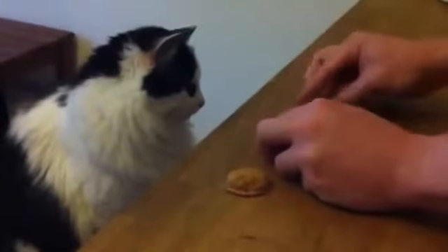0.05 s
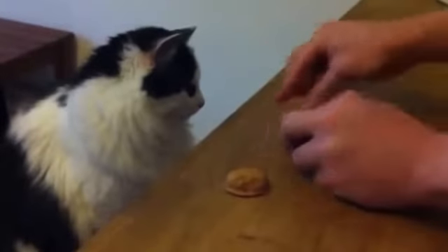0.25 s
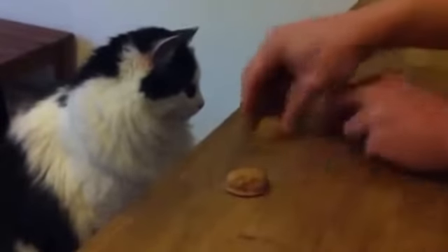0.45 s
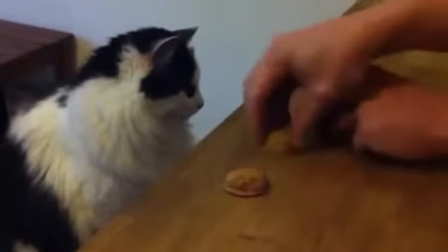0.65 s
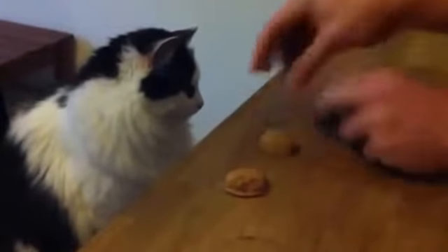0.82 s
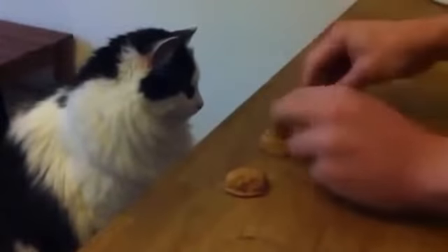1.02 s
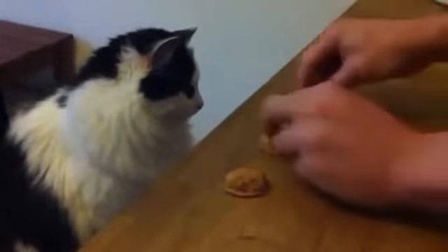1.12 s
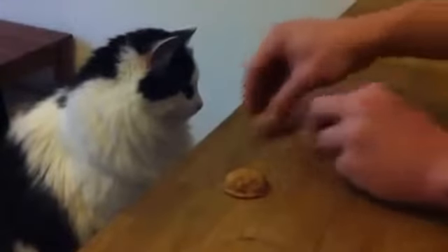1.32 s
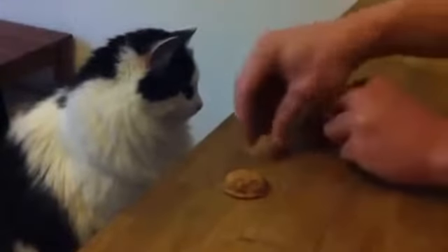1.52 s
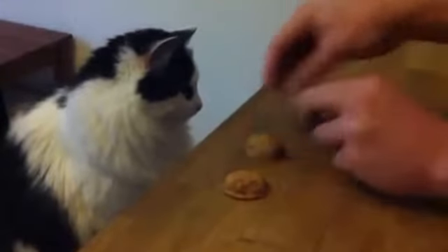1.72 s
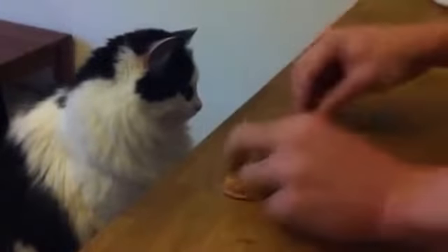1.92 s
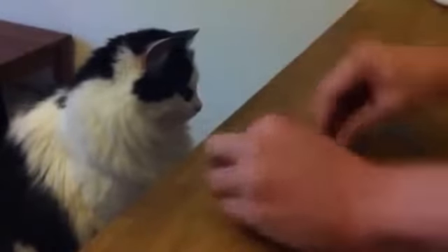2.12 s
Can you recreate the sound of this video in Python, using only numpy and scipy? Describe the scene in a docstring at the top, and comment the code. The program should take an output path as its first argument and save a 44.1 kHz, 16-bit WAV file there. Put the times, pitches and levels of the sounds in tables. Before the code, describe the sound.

Nut shells clack down and scrape across a wooden table in two short pushes.

```python
"""A small room, a shell game on a wooden table. Nut shells clack down, then are pushed across it twice.
Their rims catch on the grain, which rings the shells and rumbles in the board; they rattle to rest.
The hand's weight thumps the table softly. A fingertip drags faintly at the end of the first push."""
import sys
import numpy as np
from scipy import signal
from scipy.fft import rfft, irfft
from scipy.io import wavfile

SR = 44100
rng = np.random.default_rng(int(sys.argv[2]) if len(sys.argv) > 2 else 0)


def to_wav(sig):
    """Store sig (one row per channel, or 1-D mono) as 16-bit WAV at the path in sys.argv[1].

    Samples outside -1..1 are clipped; the rate is SR.
    """
    pcm = np.clip(np.atleast_2d(sig), -1, 1) * 32767
    pcm = np.round(pcm).astype(np.int16)
    wavfile.write(sys.argv[1], SR, pcm.T)  # frames by channels


N = 94815

# Room background. Each row: frequency in Hz, relative density in dB.
BACKGROUND_SPECTRUM = [(25, -13), (60, -19), (105, -3.5), (150, -3), (215, 8), (300, -1), (500, -5),
                       (1200, -7), (2500, -11.5), (5000, -12), (10000, -14), (15500, -15.5)]
# Rubbed resonances. Each row: centre in seconds, half length in seconds, pitch in Hz, width in Hz,
# gain in dB.
SWELLS = [(0.028, 0.029, 1460, 730, -68.5), (.522, .04, 1470, 377, -31.5), (0.553, 0.026, 2064, 490, -28),
          (0.871, 0.064, 1050, 404, -48.5), (1.391, 0.033, 2320, 200, -43.5), (1.41, 0.076, 6970, 795, -51),
          (1.425, 0.05, 3400, 700, -46), (1.418, .04, 840, 162, -49.5), (1.459, 0.026, 2000, 750, -36.5),
          (1.529, 0.019, 2210, 460, -37.5), (1.752, 0.13, 103, 24.4, -70), (1.777, 0.034, 1000, 470, -44)]
# Shells hitting the table. Each row: start in seconds, table gain in dB, shell gain in dB,
# contact corner in Hz, tick gain in dB, tick pitch in Hz, relative crunch gain in dB.
CONTACTS = [(.114, -51, -69, 1084, -51, 1220, -92), (0.2194, -21, -28, 3030, -19, 3300, -23),
            (0.2226, -50, -49, 3000, -21, 3830, -28), (.2322, -31, -33, 2500, -24.5, 3000, -38),
            (.2610, -23, -23, 1800, -27, 2720, -40), (0.2665, -23.5, -35, 4050, -25, 3120, -17),
            (.2686, -20.5, -20, 9500, -23, 6470, -32), (.2692, -36, -27, 3700, -14.5, 2300, -19.5),
            (.878, -32, -31, 3000, -32.5, 3190, -46), (0.9481, -41, -37, 2100, -27, 2200, -58),
            (.9615, -34.5, -65, 2198, -26.5, 2110, -63), (.989, -49, -36, 2000, -40, 2070, -60),
            (1.282, -50, -43, 1780, -60, 2200, -65), (1.290, -35.5, -35, 1790, -39, 2200, -60),
            (1.294, -36, -36, 1780, -36, 2300, -60), (1.677, -44, -21, 2300, -34, 2050, -38),
            (1.683, -48, -45, 2300, -18, 1990, -42), (1.7163, -42, -25, 3860, -31, 2240, -35),
            (1.743, -28.5, -44, 7000, -44, 2350, -34), (1.755, -32.5, -53, 8000, -35, 4300, -39),
            (1.781, -41.5, -32, 6460, -32.5, 4080, -34), (1.7845, -43, -53, 2960, -30, 2000, -28),
            (1.817, -32, -33, 2620, -33.5, 3330, -34), (2.1363, -42, -33, 1890, -35, 2590, -61),
            (2.1388, -32.5, -30, 1900, -48, 2220, -29.5), (2.1425, -40, -45, 2050, -32.5, 2120, -28)]
# Table and shell modes. Each row: frequency in Hz, relative gain in dB, T60 in seconds.
TABLETOP_MODES = [(250.5, -31.5, 0.17), (824, -12, 0.053), (1078, -18.5, 0.06), (1254, -10, 0.02),
                  (1550, -6.5, 0.0073)]
NUTSHELL_MODES = [(2106, -4, 0.027), (2373, -11.5, 0.05), (2980, -12.5, 0.031), (3560, -15, 0.014),
                  (4760, -12, 0.0092), (5200, -4.5, 0.01), (6140, -8.5, 0.0044), (6680, -5.5, 0.012),
                  (9600, -37, .005), (11800, -23, 0.001), (13000, -5, .003)]
# Hand on the table. Each row: start in seconds, gain in dB.
HAND_THUMPS = [(.265, -78), (.868, -65)]
# Push envelopes. Each row: time in seconds, scrape gain in dB, hiss gain in dB.
PUSH_1_LEVELS = [(0.278, -43.5, -95), (.39, -45, -59.5), (.445, -42, -54), (.5, -34, -43.5),
                 (.548, -36.5, -42.5), (.6, -38.5, -46), (.68, -42.5, -52), (.785, -38.5, -51),
                 (.875, -48, -58), (.905, -52, -80)]
PUSH_2_LEVELS = [(1.299, -58.5, -71), (1.345, -48, -62), (1.395, -41, -57), (1.42, -40, -54),
                 (1.452, -35.5, -51.5), (1.535, -35.5, -48), (1.6, -38, -49.5), (1.65, -35, -47.5),
                 (1.7, -42, -55.5), (1.785, -39, -56), (1.809, -73, -86)]
# Shell scrape, board rumble, rim hiss per push. Each row: frequency in Hz, relative density in dB.
SCRAPE_SPECTRUM = [(100, -42.5), (450, -28), (620, -13.5), (800, -10), (920, -10), (1100, -8.5),
                   (1550, -7.5), (1800, -4.5), (2000, -3.5), (2140, 2), (2380, -5), (2750, -13.5),
                   (3600, -12), (4400, -19), (5700, -26), (7000, -23.5), (9000, -32), (15000, -36)]
RUMBLE_SPECTRUM = [(30, -35), (75, -27), (105, -16), (135, -11), (240, 2), (340, 1), (440, -7.5),
                   (520, 5.5), (900, -35), (3000, -82)]
HISS_1_SPECTRUM = [(2000, -41), (5500, -12.5), (7200, -3), (8500, -13), (10300, -12), (11600, 1.5),
                   (12600, -9.5), (13800, -9), (14900, -40), (16000, -9)]
HISS_2_SPECTRUM = [(2000, -27), (5700, -1), (7100, 6), (8300, -14), (10500, -4), (11800, 1.5), (12600, -2),
                   (13800, 1), (14900, -16), (16000, -6.5)]
# Fingertip on wood. Each row: time in seconds, judder rate in Hz, level in dB.
FINGER_TRACK = [(.85, 289, -72), (.88, 255, -63), (.915, 218, -58), (.945, 160, -62.5), (.965, 145, -70)]
# Room decay. Each row: frequency in Hz, T60 in seconds.
ROOM_DECAY = [(150, 0.54), (700, .7), (2100, 0.7), (4500, 0.7459), (8000, 0.54), (14000, 0.6141)]


def amp(db):
    """Decibels to gain."""
    return 10 ** (np.asarray(db) / 20)


def unit(x):
    """Scales to rms 1."""
    return x / np.sqrt(np.mean(x ** 2) + 1e-20)


def decay(t, t60_s):
    """Falls 60 dB in t60_s."""
    return np.exp(-np.log(1000) * t / t60_s)


def read(points, hz):
    """Reads a table on a log-frequency axis."""
    points_hz, values = np.transpose(points)
    return np.interp(np.log(hz + 1), np.log(points_hz + 1), values)


def colour(x, spectrum):
    """Filters by a spectrum, to rms 1."""
    gain = amp(read(spectrum, np.fft.rfftfreq(2 * N, 1 / SR)))
    return unit(irfft(rfft(x, 2 * N) * gain)[:N])


def add(mix, start_s, sound):
    """Mixes a sound in at start_s."""
    part = mix[round(start_s * SR):][:len(sound)]
    part += sound[:len(part)]


def resonate(x, hz, width_hz):
    """Two-pole resonance."""
    r = np.exp(-np.pi * width_hz / SR)
    return signal.lfilter([1, 0, -1], [1, -2 * r * np.cos(2 * np.pi * hz / SR), r * r], x)


def background(level_db=-64.5):
    """Quiet, steady room noise."""
    return amp(level_db) * colour(rng.standard_normal(N), BACKGROUND_SPECTRUM)


def rim_grip(depth_db=1.4, corner_hz=171):
    """Friction gain of a juddering rim."""
    lowpass = signal.butter(2, corner_hz, fs=SR, output="sos")
    judder = unit(signal.sosfilt(lowpass, rng.standard_normal(N)))
    return amp(depth_db * judder)


def catches(grip, rate_per_s=5000, spread_db=3):
    """Tiny uneven impulses as a rim catches on the grain."""
    size = amp(spread_db * np.minimum(rng.exponential(1, N), 3))
    return grip * size * rng.choice([-1., 1.], N) * (rng.random(N) < rate_per_s / SR)


def swells(grip, flatness=3.4):
    """Single resonances of shell or table swell under the rubbing."""
    t, out = np.arange(N) / SR, np.zeros(N)
    for centre_s, half_s, hz, width_hz, db in SWELLS:
        envelope = np.exp(-abs((t - centre_s) / half_s) ** flatness)
        ringing = resonate(catches(grip), hz, width_hz)
        out += amp(db) * envelope * unit(resonate(ringing, hz, width_hz))
    return out


def ring(modes, corner_hz, t, rise_s=0.00013):
    """Struck modes die away; a soft contact weakens those above its corner."""
    detunes = 1 + 0.0094 * rng.standard_normal(len(modes))
    out = np.zeros(len(t))
    for k, ((hz, db, t60_s), detune) in enumerate(zip(modes, detunes)):
        gain = (-1) ** k * amp(db) / np.hypot(1, (hz / corner_hz) ** 2)
        out += gain * decay(t, t60_s) * np.sin(2 * np.pi * hz * detune * t)
    return out * (1 - np.exp(-t / rise_s))


def tick(hz, t, rise_s=0.00014, t60_s=0.0081):
    """Short ping of a contact."""
    return (1 - np.exp(-t / rise_s)) * decay(t, t60_s) * np.sin(2 * np.pi * hz * t)


def crunch(corner_hz, t, rise_s=0.00084, low_hz=2200):
    """Noise burst of the rough rim, brighter on a hard contact."""
    high_hz = np.clip(2.06 * corner_hz, 1.2 * low_hz, 9500)
    burst = t / rise_s * np.exp(1 - t / rise_s) * rng.standard_normal(len(t))
    return signal.sosfilt(signal.butter(3, [low_hz, high_hz], "band", fs=SR, output="sos"), burst)


def knocks(crunch_trim_db=-3):
    """Each contact rings table and shell, ticks and crunches."""
    t, out = np.arange(SR // 8) / SR, np.zeros(N)
    for start_s, table_db, shell_db, corner_hz, tick_db, tick_hz, crunch_db in CONTACTS:
        knock = amp(table_db) * ring(TABLETOP_MODES, corner_hz, t)
        knock -= amp(shell_db) * ring(NUTSHELL_MODES, corner_hz, t)
        knock -= amp(tick_db) * tick(tick_hz, t)
        knock += amp(crunch_db + crunch_trim_db) * crunch(corner_hz, t)
        add(out, start_s, knock)
    return out


def hand_thumps(hz=55, rise_s=0.008):
    """The hand's weight thumps the table."""
    t, out = np.arange(N) / SR, np.zeros(N)
    thump = t / rise_s * np.exp(-t / rise_s) * np.sin(2 * np.pi * hz * t)
    for start_s, db in HAND_THUMPS:
        add(out, start_s, amp(db) * thump)
    return out


def pushes(grip):
    """The sliding rim scrapes, hisses and rumbles in the board."""
    t, out = np.arange(N) / SR, np.zeros(N)
    scrape = colour(catches(grip), SCRAPE_SPECTRUM)
    rumble = colour(catches(grip), RUMBLE_SPECTRUM)
    for push, hiss_spectrum in (PUSH_1_LEVELS, HISS_1_SPECTRUM), (PUSH_2_LEVELS, HISS_2_SPECTRUM):
        hiss = colour(grip * rng.standard_normal(N), hiss_spectrum)
        times_s, *levels_db = np.transpose(push)
        scrape_db, hiss_db = (np.interp(t, times_s, db, -200, -200) for db in levels_db)
        rumble_db = -59 + 0.2 * (scrape_db + 40)  # follows the scrape weakly
        out += amp(scrape_db) * scrape + amp(hiss_db) * hiss + amp(rumble_db) * rumble
    return out


def finger_drag():
    """Skin judders on wood: a faint groan, falling as the finger stops."""
    t = np.arange(N) / SR
    times_s, hz, db = np.transpose(FINGER_TRACK)
    phase = 2 * np.pi * np.cumsum(np.interp(t, times_s, hz)) / SR
    return amp(np.interp(t, times_s, db, -200, -200)) * unit(np.sin(phase))


def room(x, early_db, tail_db, reflections_per_s=2500):
    """Direct sound, early reflections off table and hands, and a diffuse tail."""
    hz, frames_s, noise = signal.stft(rng.standard_normal(SR), SR, nperseg=256)
    tail = signal.istft(noise * decay(frames_s, read(ROOM_DECAY, hz)[:, None]), SR, nperseg=256)[1][:SR]
    t = np.arange(SR) / SR
    tail *= np.minimum(t / 0.006, 1)
    early = rng.standard_normal(SR) * (rng.random(SR) < reflections_per_s / SR)
    early *= decay(t, t60_s=0.03) * (t > 0.001)
    response = amp(tail_db) * tail / np.linalg.norm(tail) + amp(early_db) * early / np.linalg.norm(early)
    return x + signal.fftconvolve(x, response)[:N]


def scene():
    """Slides and knocks in the room, dry hand sounds, background; mono."""
    mix = background()
    grip = rim_grip()
    mix += amp(-0.5) * room(pushes(grip) + swells(grip), early_db=-6, tail_db=-5.5)
    mix += room(knocks(), early_db=-11.5, tail_db=-6.5)
    mix += hand_thumps() + finger_drag()
    return mix[None]


def record(dry):
    """Steep low-pass."""
    cutoff_hz = 15850
    lowpass = signal.firwin(511, cutoff_hz, window=("kaiser", 9), fs=SR)
    return signal.oaconvolve(dry, lowpass[None], "same")


dry = scene()
out = record(dry)
to_wav(out)
```